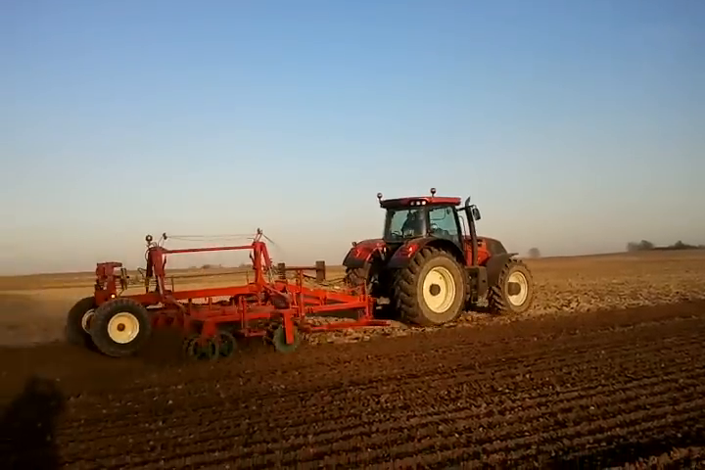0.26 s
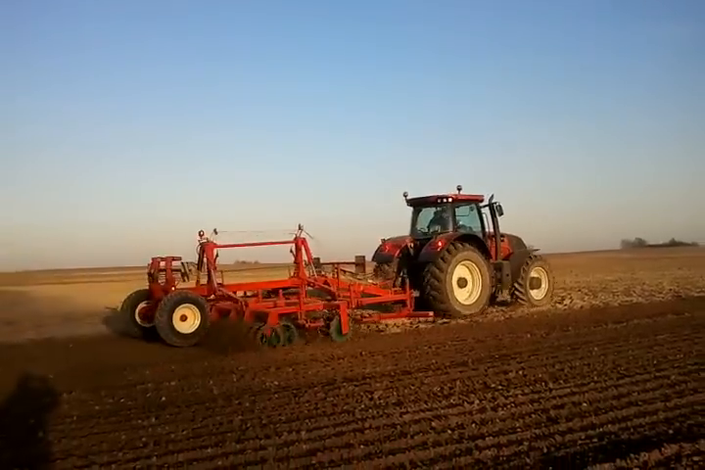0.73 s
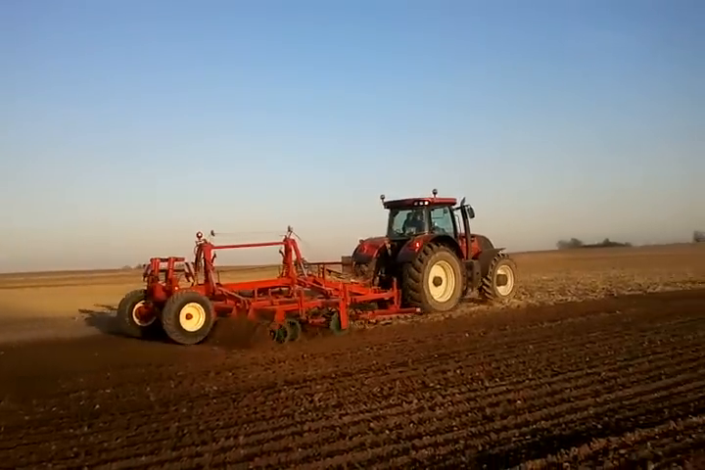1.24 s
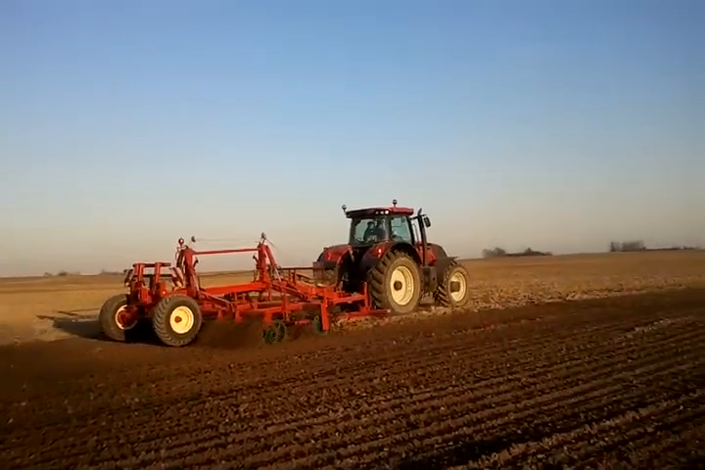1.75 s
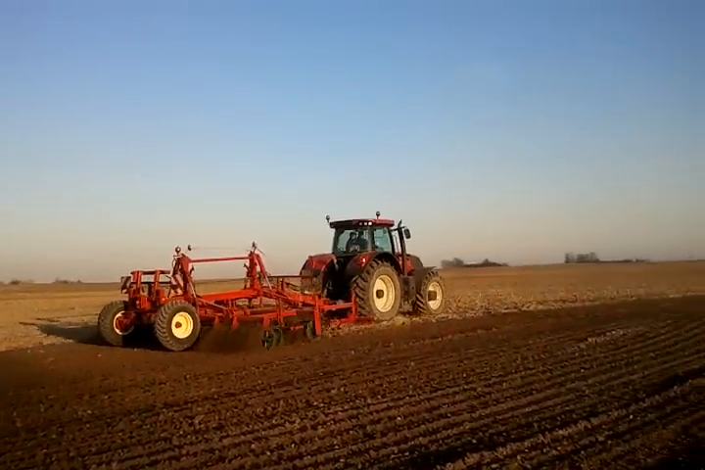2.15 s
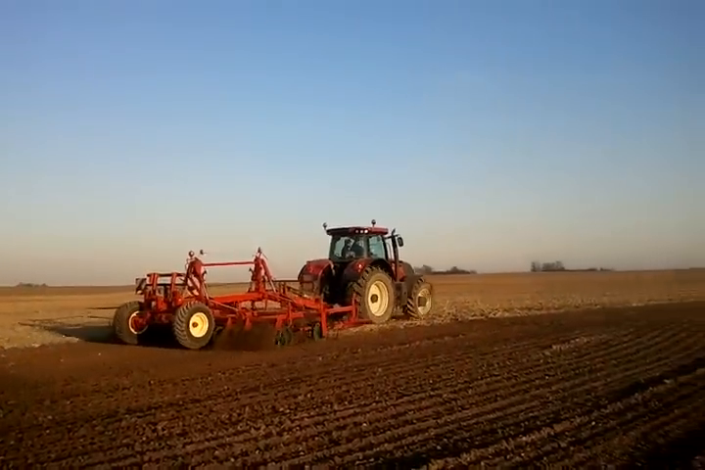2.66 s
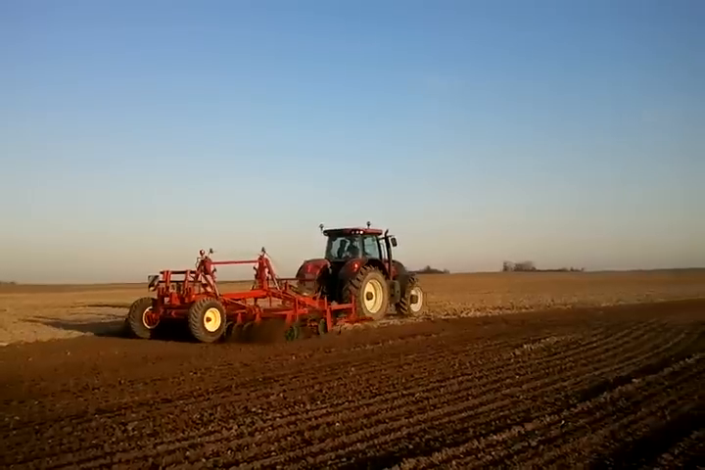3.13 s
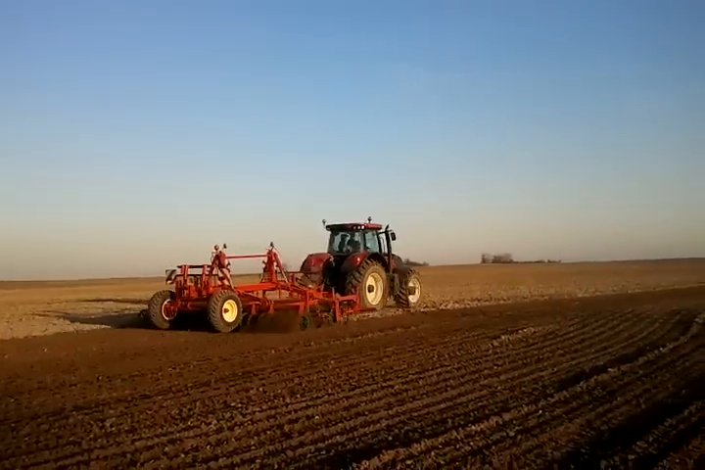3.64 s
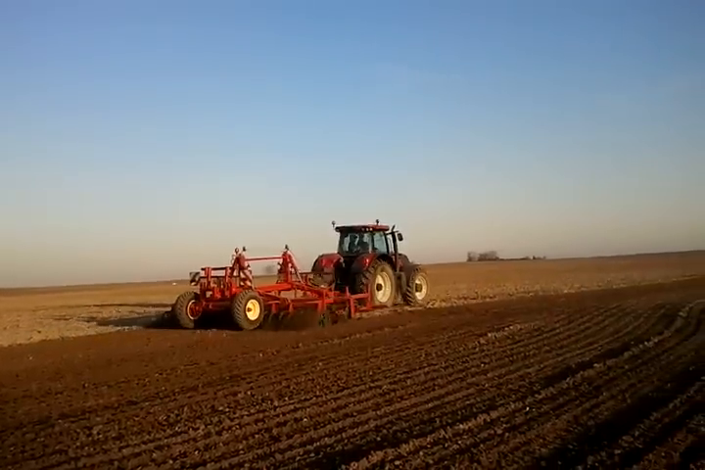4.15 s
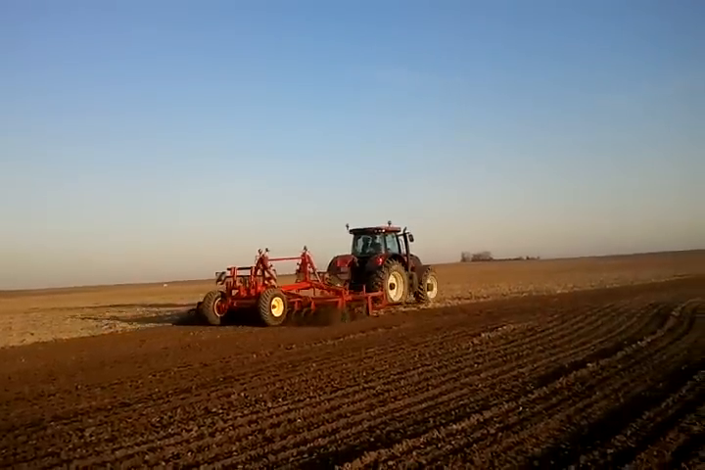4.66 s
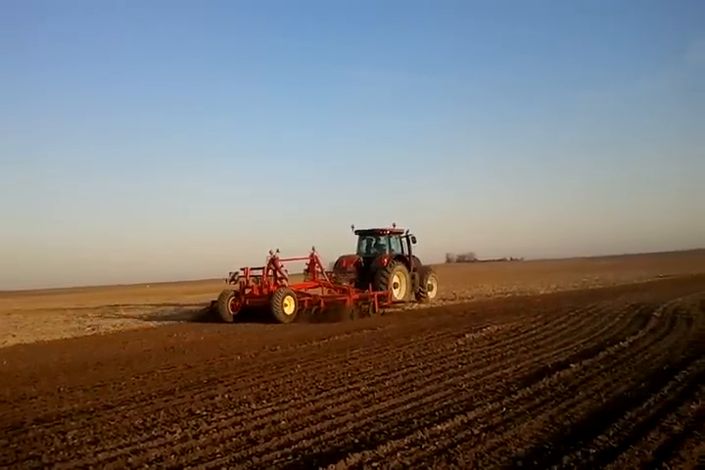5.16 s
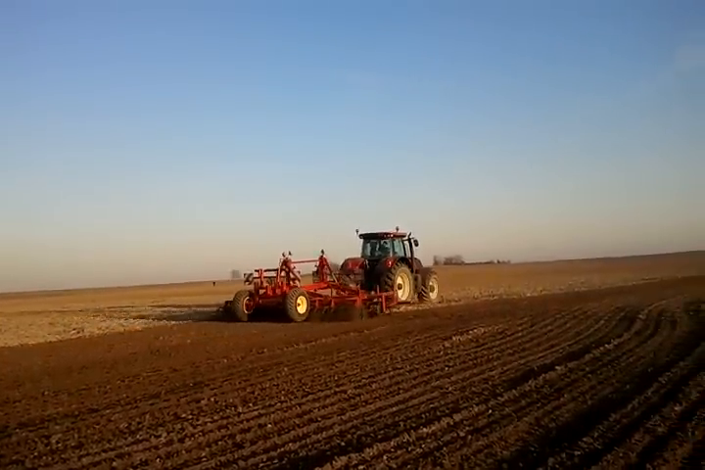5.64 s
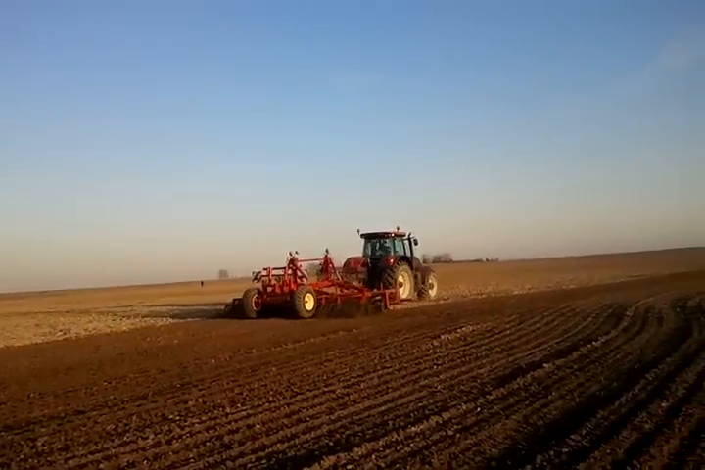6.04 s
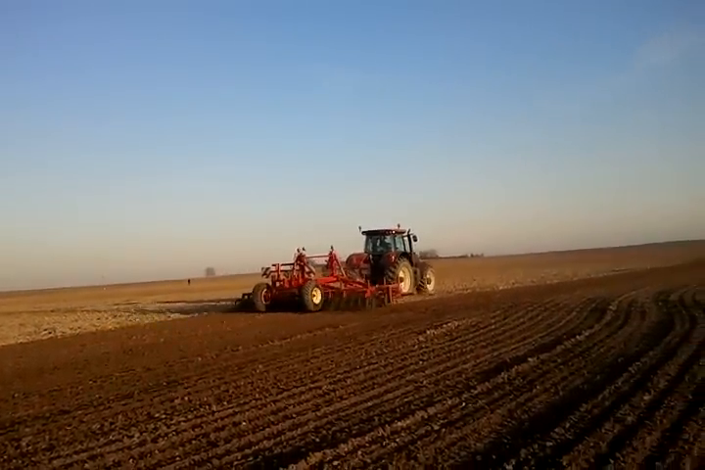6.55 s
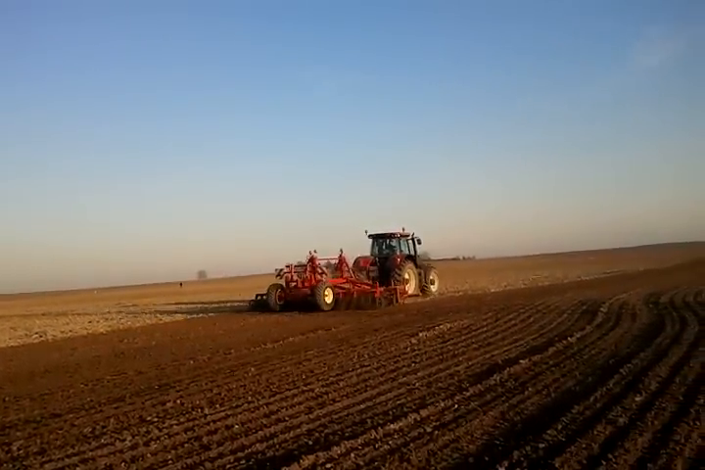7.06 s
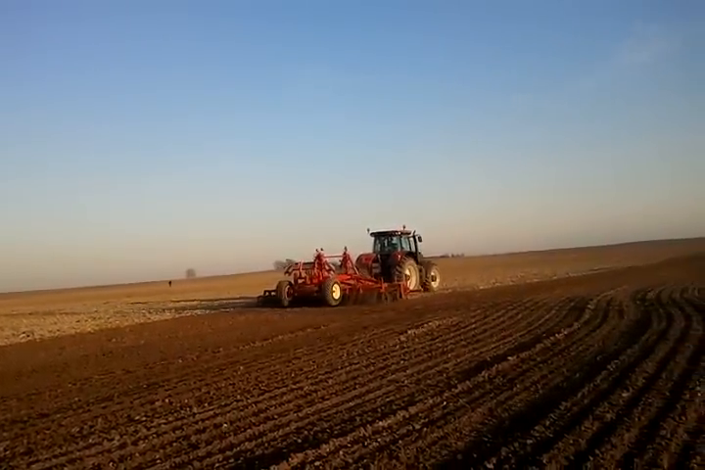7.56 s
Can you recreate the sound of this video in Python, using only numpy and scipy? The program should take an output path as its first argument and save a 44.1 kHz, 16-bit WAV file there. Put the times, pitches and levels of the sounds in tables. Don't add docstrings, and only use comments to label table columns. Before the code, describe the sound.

A heavy diesel engine drones at constant speed, with gear and hydraulic whine and a grainy rush of soil through metal tines. It starts close and moves steadily into the distance. Sharp stone clanks stand out near half a second and again around one and a half, then become sparser and fainter. Low wind buffeting overloads the small exposed microphone, mostly in the first two and a half seconds, with a calmer middle and later puffs.

```python
import sys
import numpy as np
from scipy import signal
from scipy.fft import rfft, irfft
from scipy.io import wavfile
from scipy.ndimage import uniform_filter1d

SR = 44100
rng = np.random.default_rng(int(sys.argv[2]) if len(sys.argv) > 2 else 0)


def dump_mix(stems):
    frames = np.atleast_2d(stems).T
    limited = np.clip(frames, -1, 1)
    pcm = np.round(limited * 32767).astype(np.int16)
    wavfile.write(sys.argv[1], SR, pcm)


def volts(x):
    e = np.asarray(x, float) / 20
    return 10 ** e


N = 343970
TIME_S = np.arange(N) / SR


def curve(table):
    s, *columns = np.transpose(table)
    return [np.interp(TIME_S, s, column) for column in columns]


def unit(x):
    return x / np.sqrt(np.mean(x ** 2))


def band(x, lo_hz, hi_hz):
    return signal.sosfilt(signal.butter(2, [lo_hz, hi_hz], "bandpass", fs=SR, output="sos"), x)


def walk(rate):
    hold = int(SR / rate)
    steps = np.repeat(rng.standard_normal(N // hold + 1), hold)
    return unit(uniform_filter1d(uniform_filter1d(steps, hold), hold)[:N])


def distance():
    nearest_m, speed_m_s, abreast_s = 12.46, 4.03, -1.18
    metres = np.hypot(nearest_m, speed_m_s * (TIME_S - abreast_s))
    return metres, -20 * np.log10(metres / 12)


# start t/s, length t/s, strength level/dB, brightness/dB (small eddies over large)
GUST_TIMES = [(0, 0.225, -13, 0.5), (0.229, 0.14, -13, 0.5), (0.37, 0.22, -13, 2),
              (0.651, 0.17, -12.5, 2.5), (0.864, 0.038, -8.5, 2), (1.008, 0.19, -19, 0.5),
              (1.277, 0.18, -17, -6.5), (1.54, 0.1, -16.5, 1.5), (1.632, 0.08, -14, -7.5),
              (1.751, 0.27, -11.5, 0), (1.848, .1, -7, -2), (1.969, 0.18, -10.5, 0),
              (2.098, 0.096, -6.5, 0.5), (2.178, 0.2, -9.5, -2), (2.41, 0.084, -7.5, -4),
              (2.676, 0.03, -20, -6), (4.72, 0.058, -19.5, -10), (4.904, 0.17, -21.5, -7.5),
              (5.04, 0.17, -14, -4), (5.69, .1, -19.5, -4), (5.795, .13, -27.5, -12.5),
              (6.197, 0.082, -16, -9.5), (6.273, 0.12, -15, -4), (6.421, 0.099, -21.5, 1),
              (6.633, 0.062, -19, -1), (6.99, 0.075, -24, -10.5), (7.142, 0.16, -28, -4),
              (7.348, 0.21, -15.5, 0), (7.552, 0.088, -18, -6.5), (7.742, .05, -20.5, -6)]
BREEZE_LEVELS = (-28.5, -30.5, -48)
GUST_LAYER_LEVELS = (-4, -1.5, -5.5)
BRIGHTNESS_LEAN = (-0.95, 0, 0.97)


def gusts():
    rise_s, fall_s = 0.021, 0.047
    power = np.outer(volts(np.array(BREEZE_LEVELS)) ** 2, np.ones(N))
    for start, length, db, bright_db in GUST_TIMES:
        rise, fall = (TIME_S - start) / rise_s, (start + length - TIME_S) / fall_s
        shape = np.clip(np.minimum(rise, fall) + .5, 0, 1) ** 2
        layer_db = db + np.array(GUST_LAYER_LEVELS) + bright_db * np.array(BRIGHTNESS_LEAN)
        power += np.outer(volts(layer_db) ** 2, shape ** 2)
    return 10 * np.log10(power)


def wind():
    rumble_db, thump_db, flutter_db = (db + 2 * walk(16) for db in gusts())
    eddy_db = 3.7 * np.tanh(0.23 * walk(30) + 0.36 * walk(60))

    def layer(db, lo_hz, hi_hz):
        return volts(db) * unit(band(rng.standard_normal(N), lo_hz, hi_hz))

    rumble = layer(rumble_db - 2.7 + 0.47 * eddy_db, 30, 70.6)
    thump = layer(thump_db - 0.97 + eddy_db, 75.5, 156)
    flutter = layer(flutter_db - 3.0 + 1.93 * eddy_db, 168, 291)
    fringe = layer(1.41 * flutter_db - 10.5 + 0.83 * eddy_db, 330, 580)
    return rumble + thump + flutter + fringe


# t/s, peak level/dB, f/Hz
EDDY_PUFFS = [(0.529, -0.5, 93.5), (0.666, -10, 89), (0.872, -1, 82), (1.28, -1, 75.7), (1.477, -8, 88),
              (1.557, -10, 123), (1.701, -16, 86.4), (1.813, -8, 86.1), (2.326, 3, 87.6), (2.47, 8.5, 85.3),
              (2.563, -19, 90.7), (3.129, -23, 230.8), (3.295, -20, 305), (3.819, -9, 81),
              (5.014, -4.5, 87.5), (5.13, 4.5, 82.7), (5.246, -7, 83.4), (5.812, -8.5, 90),
              (6.429, -1.5, 61.4), (6.477, -1, 90), (6.593, -15, 92), (6.637, -8, 80.7), (6.899, -8.5, 143),
              (7.152, -13, 80.9), (7.205, -15, 99.6), (7.293, -6.5, 123.3), (7.326, -3, 88),
              (7.419, 2.5, 64.6), (7.573, -5, 99.4), (7.675, -3.5, 91.3)]
# t/s, peak level/dB, f/Hz
EDDY_FLAPS = [(0.018, -1.5, 134), (0.108, -10, 180), (0.173, -10, 217), (0.448, 0.5, 168), (0.534, -8, 144),
              (0.666, 2, 138), (0.704, -4, 187), (0.778, -9, 167), (0.878, -6.5, 156), (1.337, -16, 175.5),
              (1.565, -1.5, 132), (1.618, -9, 162), (1.765, -10, 153), (1.817, -0.5, 181),
              (2.012, 3, 177.7), (2.062, -1, 161), (2.428, -0.5, 138), (5.016, -12.5, 139),
              (5.075, -7, 134), (5.13, -5, 131.6), (6.215, -22, 130.7), (6.299, -6, 170), (6.439, -13, 140),
              (6.482, -7, 131), (6.664, -17, 133.2), (7.414, -7, 186), (7.488, 4, 144), (7.575, -2.5, 151),
              (7.673, -8.5, 301), (7.753, -9, 146)]


def puffs():
    out, t = np.zeros(N + SR), np.arange(SR // 8) / SR
    for s, db, hz in EDDY_PUFFS + EDDY_FLAPS:
        rise = t / (0.007 + .5 / hz)
        push = rise * np.exp(-rise ** 1.95)
        i = int(s * SR)
        out[i:i + len(t)] += volts(db + 2.5) * push * np.sin(2 * np.pi * (hz * t + rng.random()))
    return out[:N]


def blow(low_hz, high_hz, t60, high_db):
    t = np.arange(SR // 4) / SR
    contact = np.minimum(t / .0008, 1)
    fade = volts(-60 * t / max(t60, .02))
    crack = 1 + np.exp(-t / .003)

    grit = unit(band(rng.standard_normal(len(t)), low_hz - 400, low_hz + 450))
    mode = min(low_hz / 2200, 1) * np.sin(2 * np.pi * low_hz * t)
    side_hz = np.sqrt(low_hz * 2000) * 2 ** (1.5 * rng.random(24) - .8)
    rings = np.sin(2 * np.pi * (np.outer(side_hz, t) + rng.random((24, 1)))).sum(axis=0)
    low = volts(-0.5) * grit + mode + volts(-13) * rings * crack

    chips = rng.standard_normal(len(t))
    spray = unit(band(chips, 3400, 6600)) * crack * fade ** .3
    ring = min(4300 / high_hz, 1) ** 2 * np.sin(2 * np.pi * high_hz * t)
    halo = unit(band(chips, high_hz / 1.07, high_hz * 1.07))
    high = .75 * ring + .3 * halo + .6 * spray
    return contact * fade * (low + volts(high_db + 2) * high)


# t/s, peak level/dB, ring f/Hz
STONE_THUDS = [(0.181, -20, 2310), (0.2882, -29, 2160), (0.5427, -8, 2330), (0.6059, 2.5, 3340),
               (1.1598, -17, 1870), (1.2343, -14.5, 2690), (1.6182, -9, 2550), (1.6906, -8.5, 1880),
               (1.7033, -8, 2280), (1.7314, -8, 1917), (3.309, -18, 1870), (4.2637, -12, 1094),
               (4.5155, -14.5, 3080), (4.8388, -13.5, 1875), (4.9085, -15.5, 1940), (5.025, -18, 3040),
               (5.414, -8.5, 2358), (6.1094, -18.5, 1220), (6.4256, -20, 2820), (6.5622, -16, 1820),
               (6.7744, -16, 1650), (7.0179, -10.5, 3130), (7.23, -22, 2006), (7.3743, -15, 2580)]
# t/s, peak level/dB, low ring f/Hz, high ring f/Hz, t60/s
STONE_PINGS = [(0.531, -5.5, 3090, 3970, .092), (0.597, 3.5, 2475, 4026, 0.092),
               (0.6192, -11, 3380, 3800, .14), (1.579, -6, 2660, 5290, 0.1), (1.661, -13.5, 1080, 3790, .1),
               (2.2219, -16, 960.7, 4060, 0.1), (2.3494, -16, 3300, 4350, .1),
               (3.5619, -16.5, 6820, 7170, 0.056), (3.7194, -19.5, 1990, 6600, .077),
               (4.0844, -14.5, 2915, 5514, 0.064), (4.7656, -20, 2400, 5260, 0.06),
               (4.798, -17, 2603, 6100, 0.072), (4.9445, -16.5, 2220, 4700, .093),
               (5.1196, -11.5, 4330, 4270, 0.17), (5.1488, -12, 3430, 4200, 0.11),
               (5.2587, -17.5, 2353, 5280, 0.073), (6.0348, -19, 2600, 5556, 0.11),
               (6.2948, -17, 1084, 3955, 0.099), (6.8894, -21, 2200, 6320, 0.11),
               (7.4394, -25, 4870, 7060, 0.092)]


def clanks():
    out = np.zeros(N + SR)
    thuds = [(s, db, low_hz, 3800, 0.11, -15) for s, db, low_hz in STONE_THUDS]
    pings = [(*row, -4) for row in STONE_PINGS]
    for s, db, low_hz, high_hz, t60, high_db in thuds + pings:
        strike = blow(low_hz, high_hz, t60, high_db)
        i = int(s * SR)
        out[i:i + len(strike)] += volts(db - 13) * strike
    return out[:N]


# f/Hz, level/dB per Hz
BLOCK_SPECTRUM = [(25, 15), (50, -13), (90, 9), (130, 8), (185, 13.5), (225, -20.5), (300, -11.5), (400, 3),
                  (520, 3.5), (620, 5.5)]
# f/Hz, level/dB per Hz
SOIL_SPECTRUM = [(650, 2), (825, -2), (940, 0), (1280, -3), (1500, -3.5), (1940, -0.5), (2750, -1.5),
                 (3550, -1.5), (3800, -6), (4470, -6.5), (5200, -7.5), (7000, -8)]


def roar(phase, roar_db, treble_db):
    hz, db = np.transpose(BLOCK_SPECTRUM + SOIL_SPECTRUM + [(9500, -22)])
    f = np.maximum(np.arange(N // 2 + 1) * SR / N, 1)
    spectrum = rfft(rng.standard_normal(N)) * volts(np.interp(np.log(f), np.log(hz), db))
    knock = 1 + 0.055 * np.cos(phase) + 0.085 * np.cos(phase / 2)
    swell, total = walk(2.276), 0
    for centre in 30 * 2 ** np.arange(0, 9.1, .5):
        share = np.cos(np.pi / 2 * np.clip(2 * np.log2(f / centre), -1, 1)) ** 2
        layer = irfft(spectrum * share, N)
        high = np.clip(np.log2(centre / 500) / 2, 0, 1)
        clods = (rng.random(N) < 40 / SR) * volts(1.8 * rng.exponential(size=N))
        patter = 1 + 0.34 * signal.lfilter([1], [1, -np.exp(-1 / (0.0096 * SR))], clods)
        air_db = treble_db * np.clip(np.log2(centre / 2800), 0, 1.2)
        level_db = air_db + .5 * swell + 0.3 * walk(13)
        total = total + layer * volts(level_db) * (knock * patter) ** high
    return total * volts(roar_db) / np.sqrt(np.mean(band(total, 1200, 3600) ** 2))


def whine(hz, db, wobble, flicker_db):
    phase = 2 * np.pi * np.cumsum(hz * (1 + wobble * walk(12))) / SR
    return np.sqrt(2) * volts(db + flicker_db * walk(13)), phase


# t/s, whistle f/Hz
TURBO_SPEED = [(0, 7160), (.6, 7160), (1.35, 7290), (2.1, 7310), (2.8, 7220), (3.6, 7075), (4.4, 7130),
               (4.85, 7270), (5.4, 7180), (6.2, 7100), (7, 7140), (7.8, 7300)]


def turbo():
    loss_db = distance()[1]
    gain, phase = whine(*curve(TURBO_SPEED), -52 + 1.4 * loss_db, wobble=.001, flicker_db=2.5)
    return gain * np.sin(phase)


def gear_mesh():
    hz = 573.5 + 21.03 * np.tanh((TIME_S / 2.2) ** 2)
    swell_db = 4 * np.cos(2 * np.pi * (TIME_S - 2.62) / 4.1)
    side_db = 11.5 * np.exp(-(TIME_S / 0.76) ** 2)
    db = -35 + 1.55 * distance()[1] + swell_db + side_db
    gain, phase = whine(hz, db, wobble=0.0031, flicker_db=0)
    return gain * np.sin(phase)


PUMP_HARMONICS = [
    -1,
    -7.5,
    -6,
    -20.5,
]


def pump():
    metres, loss_db = distance()
    behind = 1 - 12.46 / metres
    gain, phase = whine(475.6 + 0 * TIME_S, -36 + loss_db + 9.5 * behind, wobble=0.00485, flicker_db=0.1)
    hidden_db = -7 * np.clip((1.2 - TIME_S) / .3, 0, 1)
    total = 0
    for k, db in enumerate(PUMP_HARMONICS):
        smeared = (k + 1) * phase + .55 * k * walk(45)
        total = total + volts(db + (k > 0) * hidden_db) * np.sin(smeared)
    return gain * total


# multiple of the firing rate, level/dB
EXHAUST_ORDERS = [
    (.5, -29.5),
    (1, 3),
    (1.5, -9),
    (2, -6),
    (2.5, -13.5),
    (3, -57),
    (4.5, -22),
]


def exhaust(phase, db):
    total = 0
    for order, order_db in EXHAUST_ORDERS:
        total = total + volts(order_db + 1.5 * walk(7)) * np.cos(order * (phase - .3))
    return volts(db) * np.sqrt(2) * total


# t/s, firing rate f/Hz, draught load level/dB
ENGINE_LOAD = [(0, 75.07, 1), (.6, 75.93, 0), (1.1, 75.93, -.5), (1.5, 75.5, 1.5), (2, 75.63, 0),
               (2.5, 76.05, 0.5), (3, 75.1, -0.5), (3.5, 76.37, -.5), (4.2, 75.5, 0), (4.9, 76.16, 2),
               (5.5, 76.26, -1), (6, 75.5, 0.5), (6.5, 75.43, 0), (7, 75.4, -1), (7.4, 75.6, -1.5),
               (7.8, 75.8, 1)]


def tractor():
    (hz, load_db), (metres, loss_db) = curve(ENGINE_LOAD), distance()
    phase = 2 * np.pi * np.cumsum(hz * (1 + 0.0064 * walk(22))) / SR
    beats = exhaust(phase, -19.5 + 0.97 * loss_db + .5 * load_db)
    treble_db = -6.5 - 0.1065 * metres
    rush = roar(phase, -25 + 1.022 * loss_db + load_db, treble_db)
    return rush + turbo() + gear_mesh() + pump() + beats


def scene():
    return (wind() + puffs() + clanks() + tractor())[None]


def band_limit(x):
    return signal.sosfilt(signal.butter(12, 15800, fs=SR, output="sos"), x)


def record(dry):
    overload, offset = .71, .006
    dull = signal.sosfilt(signal.butter(6, 7400, fs=SR, output="sos"), dry)
    narrow = signal.sosfilt(signal.ellip(8, .3, 70, 8600, fs=SR, output="sos"), dull)
    x = (narrow + offset) * np.minimum(np.arange(N)[::-1] / 150, 1)
    railed = x / (1 + np.abs(x / overload) ** 18) ** (1 / 18)
    return band_limit(railed)


dry = scene()
out = record(dry)
dump_mix(out)
```